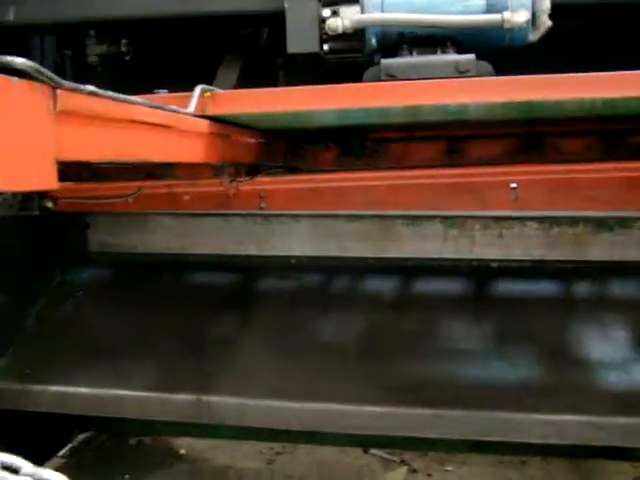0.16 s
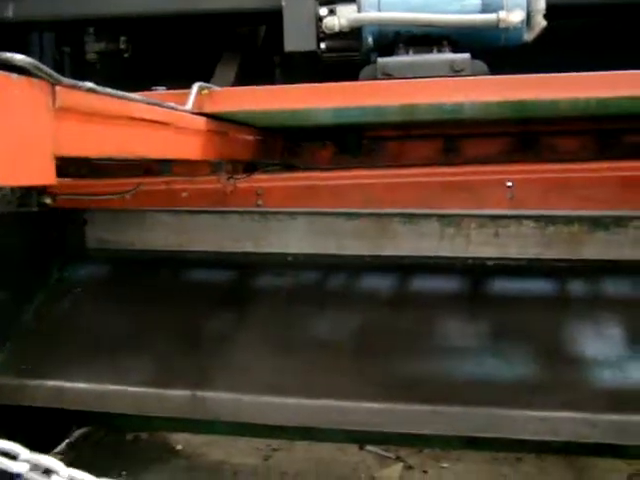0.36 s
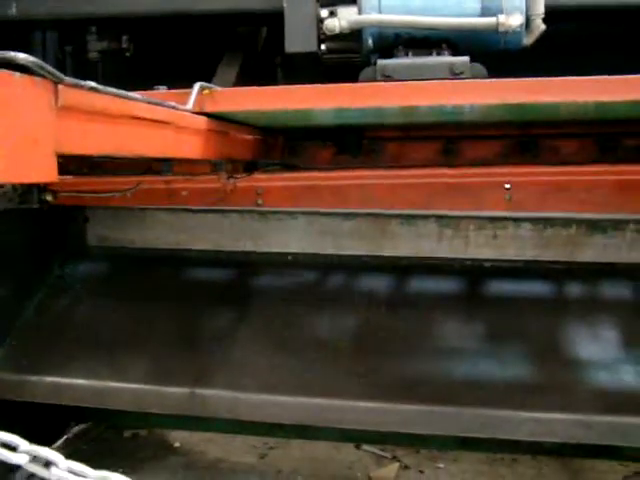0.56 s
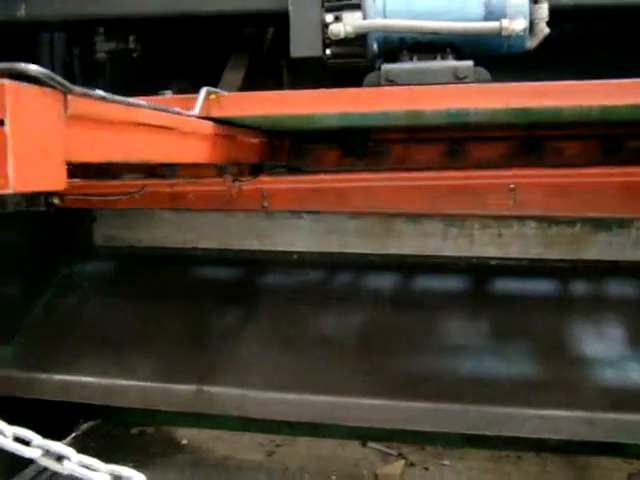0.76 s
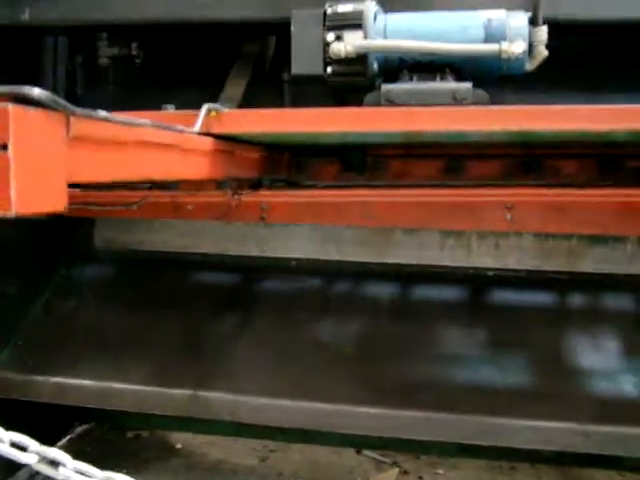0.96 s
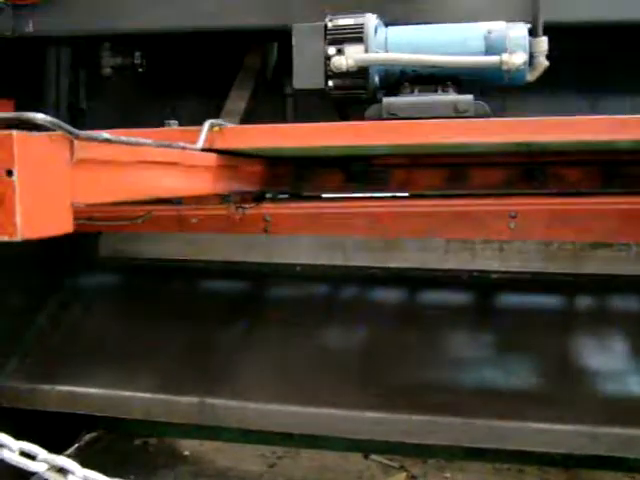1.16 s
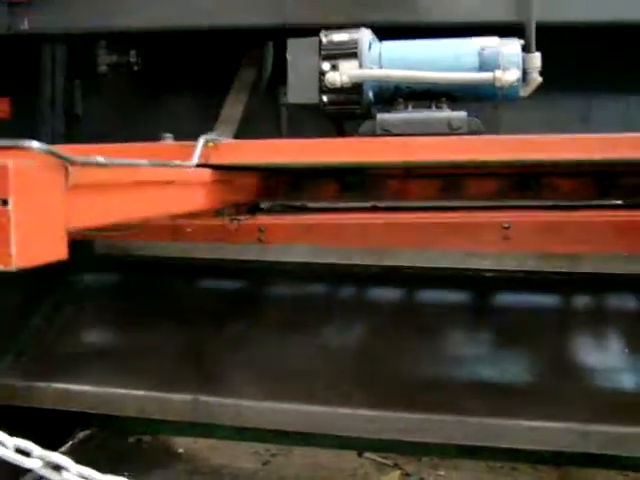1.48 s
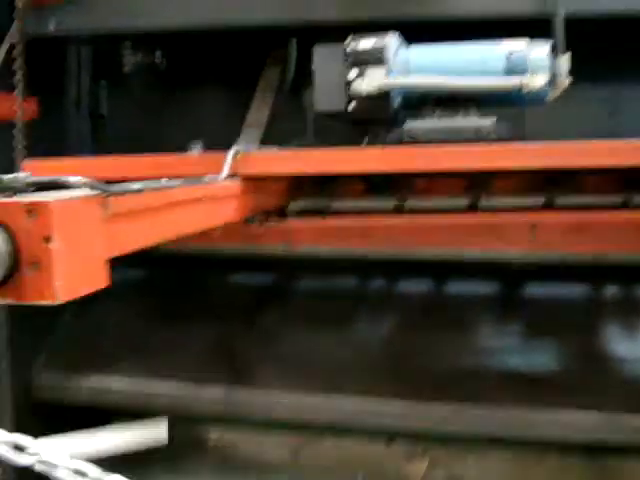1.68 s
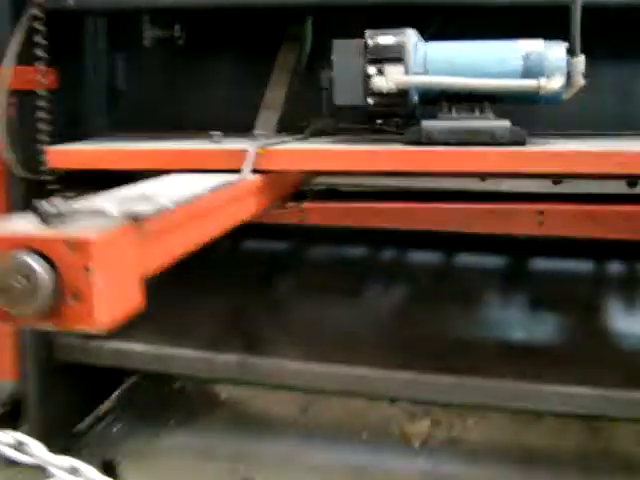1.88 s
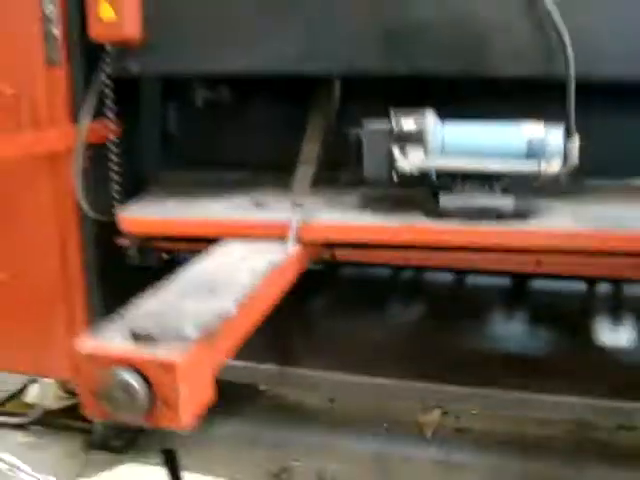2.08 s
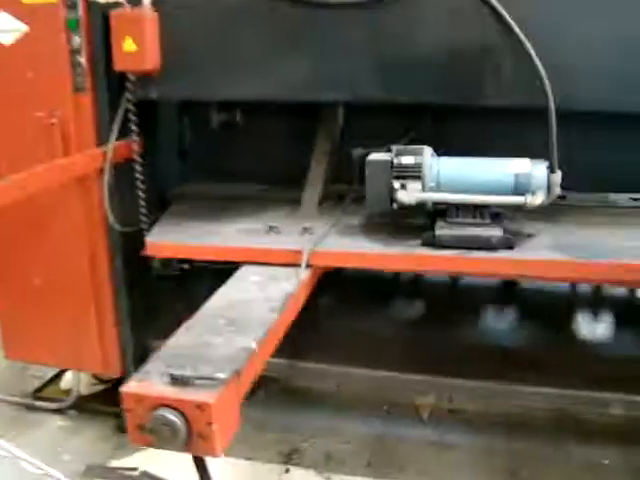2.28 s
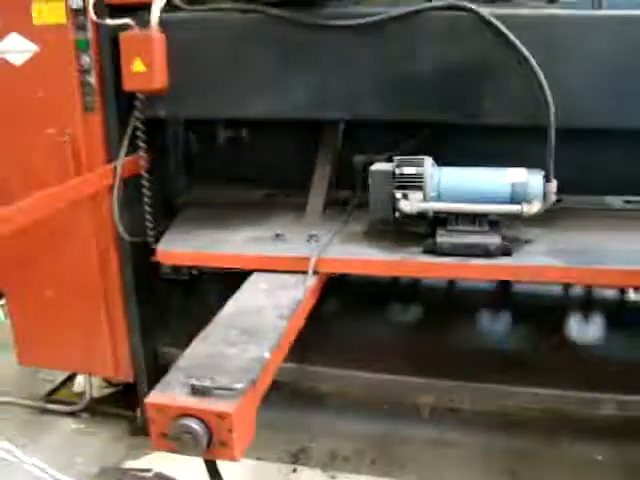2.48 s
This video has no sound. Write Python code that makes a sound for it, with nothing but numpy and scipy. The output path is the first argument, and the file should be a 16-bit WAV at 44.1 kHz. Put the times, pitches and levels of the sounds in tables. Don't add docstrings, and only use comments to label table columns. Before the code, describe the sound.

A hydraulic metal shear roars and whines close by in a workshop; the blade scrapes, the frame knocks hard, the cut strip crashes and rings, then a valve hisses. Small mono microphone with dull, patchy treble.

```python
import sys
import numpy as np
from scipy import signal
from scipy.fft import rfft, irfft
from scipy.io import wavfile
from scipy.ndimage import uniform_filter1d

SR = 44100
rng = np.random.default_rng(int(sys.argv[2]) if len(sys.argv) > 2 else 0)


def dump(signal):
    limited = np.clip(np.atleast_2d(signal).T, -1, 1)
    pcm = np.round(limited * 32767).astype(np.int16)
    wavfile.write(sys.argv[1], SR, pcm)


def ratio(d):
    e = np.asarray(d, float) / 20
    return 10 ** e


N = 115983

# time in seconds, level in dB.
VALVE_LEVEL = [
    (0, -29),
    (.5, -28.5),
    (.8, -33),
    (1.2, -35.5),
    (2.1, -71),
    (2.4, -34.5),
    (2.48, -22),
    (2.63, -20),
]
# frequency in Hz, density in dB per Hz.
VALVE_COLOUR = [(2500, 0.5), (6000, 1), (10300, 1)]

# time in seconds, roar level in dB, weight of the low rumble in dB.
PUMP_EFFORT = [(0, -22, -7), (0.451, -21, -5.5), (0.671, -22.5, -10), (.9, -24, -12), (1.241, -23.5, -5.5),
               (1.25, -28.5, -14), (1.42, -30.5, -14.5), (1.52, -32.5, -17.5), (1.7, -30, -10.5),
               (1.83, -27, -11.5), (1.86, -29, -22), (2.05, -31, -15), (2.24, -27, -12.5),
               (2.3, -25.5, -8.5), (2.63, -29.5, -8)]
# frequency in Hz, density in dB per Hz.
ROAR_COLOUR = [(25, -33), (90, -24), (154, -19), (374, -1.5), (797, -2.5), (1500, 0), (2500, -3),
               (4000, -9), (10400, -23)]
# frequency in Hz, level in dB re the roar.
PISTON_WHINE = [(372, -31), (619, -26), (1885, -14.5), (117, -40.5), (58.3, -56)]
RUMBLE_HZ, PATCH_DB, FLICKER_DB = 707, 1.5, 0.07

# start in seconds,
# level in dB, length in seconds, centre in Hz.
SCRAPES_AND_THUMPS = [(.004, -29.5, 0.1, 2930), (0.544, -22.5, .05, 2730), (0.547, -28, .04, 3630),
                      (0.542, -26.5, 0.056, 5000), (0.701, -19.5, 0.014, 2700), (0.7, -21.5, 0.013, 654),
                      (1.059, -28, 0.013, 430), (1.078, -21, .008, 2570), (1.113, -21.5, 0.0073, 452),
                      (1.082, -22.5, .005, 490), (1.838, -22.5, 0.0062, 3230), (1.842, -29, 0.019, 2200)]
SCRAPE_WIDTH, SCRAPE_T60 = 0.11, 0.14
# time in seconds, level in dB.
BEAM_GROAN = [
    (1.25, -55),
    (1.3, -43.5),
    (1.7, -40),
    (1.82, -34),
    (1.85, -45.5),
    (2.15, -42),
    (2.3, -63),
]
GROAN_HZ = 969

# start in seconds, level in dB, length in seconds, pitch factor.
FRAME_KNOCKS = [
    (0.702, -15.5, 0.0051, 1.1),
    (0.723, -27, .05, 1.03),
    (0.855, -22, 0.078, 0.89),
    (0.928, -16.5, 0.03, 1.07),
    (0.975, -24.5, 0.11, 0.99),
    (1.045, -27.5, 0.048, 0.91),
    (1.268, -26, 0.014, 1.01),
    (2.269, -22.5, 0.013, 0.78),
    (2.305, -27, .02, 0.94),
]
# frequency in Hz, level in dB, t60 in seconds.
FRAME_MODES = [(468, -8, 0.28), (619, -24, 0.12), (1000, -7, 0.11), (1231, -12, 0.057), (1437, -19.5, 0.21),
               (1637, -11.5, 0.15), (1804, -12, 0.12), (2060, -17, 0.12), (2164, -10, 0.1),
               (2420, -11.5, 0.071), (2700, -11.5, 0.03)]
# frequency in Hz, density in dB per Hz.
THUD_COLOUR = [(250, -28), (550, -28), (1200, 13.5), (2600, 10), (4000, 5), (10000, -19)]
THUD_DB, THUD_T60 = -6, 0.18
# start in seconds, frequency in Hz, level in dB,
# length in seconds.
FRAME_HUMS = [(.702, 2700, -24, 0.014), (.74, 1262, -25, 0.046), (.75, 1020, -29, 0.085),
              (.85, 1240, -27.5, .055), (.93, 1000, -25, 0.082), (.932, 2450, -29, 0.023),
              (.935, 2150, -24, 0.026), (.955, 1232, -31, 0.018), (.975, 2140, -27, 0.02),
              (.97, 1460, -25, .03), (.995, 1250, -28, 0.028), (1.03, 979, -25, 0.024),
              (1.062, 2413, -28, 0.018), (1.066, 510, -29.5, 0.02)]

# start in seconds, crash in dB, low ring in dB, high ring in dB, length in seconds.
STRIP_CLANKS = [(0.543, -22.5, -45, -37.5, 0.034), (1.068, -27, -52, -29.5, 0.043),
                (1.244, -34.5, -28, -23, 0.012), (1.259, -34, -29.5, -43, 0.038),
                (1.299, -34.5, -35.5, -31, 0.041), (1.438, -27, -31, -33.5, 0.032),
                (1.489, -37, -28, -27, 0.0086), (1.499, -38, -26, -43, 0.022),
                (1.544, -33.5, -33.5, -31.5, 0.041), (1.598, -45, -31.5, -39, 0.015),
                (1.622, -45, -29.5, -34, 0.0093), (1.835, -26.5, -37, -34, 0.027),
                (1.867, -28.5, -39, -29.5, 0.027), (1.913, -32.5, -47, -45, 0.041),
                (1.969, -32.5, -31, -36.5, 0.048), (2.266, -29, -37, -36, 0.011)]
# frequency in Hz, level in dB, t60 in seconds.
STRIP_LOW_MODES = [(2760, -34, 0.051), (3000, -8, 0.37), (3140, -7.5, 0.17), (3212, -5, 0.26),
                   (3455, -32, 0.18)]
# frequency in Hz, level in dB, t60 in seconds.
STRIP_HIGH_MODES = [(3820, -1.5, 0.22), (4100, -10.5, 0.25), (4572, -4.5, 0.29), (4900, -3, 0.14),
                    (5100, -2, 0.075), (5600, -3.5, 0.08), (6900, 0, .05), (8500, -5.5, 0.033),
                    (9300, -1, 0.061), (10070, 0, 0.055)]
# frequency in Hz, density in dB per Hz.
CRASH_COLOUR = [(1200, -22), (2500, 1), (3500, 2), (5500, 4.5), (7500, -0.5), (10500, -12.5)]
# frequency in Hz, density in dB per Hz.
SIZZLE_COLOUR = [(3500, -29), (5500, -3), (7000, -8), (8500, 6), (10500, 2)]
CRASH_T60, SIZZLE_DB, SIZZLE_T60 = 0.24, 1, 0.26
STRIP_DETUNE = .0015
# start in seconds, frequency in Hz, level in dB,
# length in seconds.
STRIP_SONG = [(1.068, 6160, -33, 0.016), (1.084, 5850, -25, 0.01), (1.083, 7800, -27.5, 0.0046),
              (1.244, 8500, -29.5, .01), (1.256, 3140, -29.5, 0.02), (1.259, 6900, -35, .013),
              (1.261, 9330, -37, 0.018), (1.262, 4572, -31, 0.024), (1.264, 5600, -38, 0.025),
              (1.287, 9300, -39, .025), (1.292, 8400, -37, .02), (1.299, 3230, -23.5, 0.05),
              (1.303, 3480, -30, 0.026), (1.305, 3040, -31, .03), (1.328, 5140, -37, 0.042),
              (1.338, 3216, -30.5, .035), (1.34, 4550, -40, .025), (1.385, 3170, -33, 0.048),
              (1.439, 5110, -27.5, 0.032), (1.439, 3080, -27, 0.013), (1.44, 3455, -32, .035),
              (1.446, 3880, -37, 0.045), (1.467, 3030, -30, 0.017), (1.469, 3150, -17, 0.0068),
              (1.492, 3772, -31, 0.018), (1.505, 3190, -22, 0.022), (1.512, 5059, -29.5, 0.027),
              (1.54, 3440, -32, 0.029), (1.54, 2980, -34, 0.055), (1.565, 3190, -37, 0.016),
              (1.589, 3134, -27, 0.012), (1.62, 3470, -31, 0.025), (1.862, 3190, -35, .02),
              (1.85, 3015, -28, 0.023), (1.878, 3205, -31, 0.061), (1.878, 3010, -32, 0.073),
              (1.85, 4690, -37, 0.1), (1.965, 3007, -35, 0.062), (1.968, 3212, -37, 0.077)]

RATTLE_PER_S, SPREAD_DB, RATTLE_SHARE = 1000, 7, 0.57
STRIKE = 1
SING_T60, SING_RISE_S, WAVER_DB, WAVER_RAD = .07, .0025, 2.8, .55

# start in seconds,
# length in seconds, depth in dB.
LEVEL_DIPS = [
    (0.547, 0.03, -2.5),
    (1.085, 0.019, -9),
    (1.244, 0.022, -8),
    (1.285, 0.074, -7),
    (1.421, 0.013, -2),
    (1.488, 0.076, -3.5),
    (1.824, 0.0077, -1),
    (1.868, 0.091, -2.5),
]
# start in seconds, length in seconds, from Hz, to Hz.
TREBLE_GAPS = [(.524, .016, 4700, 5300), (.528, .008, 5300, 6900), (1.335, .03, 9700, 12000),
               (1.328, .007, 7100, 7900), (1.341, .006, 6200, 7900), (1.253, .005, 4800, 9500),
               (1.42, .018, 4800, 12000), (1.522, .011, 6200, 7500), (1.662, .015, 6100, 7500),
               (1.818, .018, 4800, 12000), (1.826, .007, 2800, 4800), (2.25, .009, 5300, 12000)]
# from seconds, to seconds.
BUSY_STRETCHES = [(.62, .65), (.71, .79), (1.05, 1.13), (1.25, 1.27), (1.32, 1.37)]
HOLE_SHARE, BUSY_HOLES, HOLES_ABOVE_HZ, HOLE_DB = .065, 3.5, 4800, -26
MIC_LOW_HZ, MIC_HIGH_HZ = 224, 10010
CHOKE_S, CHOKE_DB = 1.09, -5


def evened(x):
    return x / np.sqrt(np.mean(x ** 2) + 1e-20)


def read(points, hz):
    f, value = np.transpose(points)
    return np.interp(np.log(hz + 1), np.log(f + 1), value)


def filtered(x, points):
    hz = np.fft.rfftfreq(len(x), 1 / SR)
    return irfft(rfft(x) * ratio(read(points, hz)), len(x))


def coloured(x, points):
    return evened(filtered(x, points))


def burst(s, length, t60):
    t = np.arange(N) / SR - s
    return np.clip(t * 1000, 0, 1) * ratio(-60 * np.clip(t - length, 0, None) / t60)


def ring(x, hz, t60):
    r = 10 ** (-3 / (t60 * SR))
    turn = 2 * np.pi * hz / SR
    return np.sqrt(8 * (1 - r)) * signal.lfilter([np.sin(turn)], [1, -2 * r * np.cos(turn), r * r], x)


def rattle():
    sizes = ratio(SPREAD_DB * np.minimum(rng.exponential(1, N), 2))
    ticks = (rng.random(N) < RATTLE_PER_S / SR) * rng.choice([-1, 1], N) * sizes
    clumps = ratio(0.8 * evened(uniform_filter1d(rng.standard_normal(N), size=300)))
    return evened(clumps * (RATTLE_SHARE * evened(ticks) + rng.standard_normal(N)))


def struck(events, modes, contact_t60, detune):
    out, shake = np.zeros(N), rattle()
    chance = rng.standard_normal((40, len(modes), 3))
    for (s, db, length, pitch), row in zip(events, chance):
        a = round(s * SR)
        drive = (shake * burst(s, length, contact_t60))[a:a + SR // 3]
        t = np.arange(len(drive)) / SR
        for (hz, mode_db, t60), (weight, shift, phase) in zip(modes, row):
            f = hz * pitch * (1 + detune * shift)
            decay = np.minimum(t / .003, 1) * ratio(-60 * t / t60)
            blow = STRIKE * decay * np.sin(2 * np.pi * (f * t + phase))
            level = ratio(db + mode_db + 2.0 * np.clip(weight, -1.5, 1.5))
            out[a:a + SR // 3] += level * (ring(drive, f, t60) + blow)
    return out


def singing(notes):
    out = np.zeros(N)
    waver = evened(uniform_filter1d(rng.standard_normal((60, SR // 5)), size=250))
    t = np.arange(SR // 5) / SR
    for (s, hz, db, length), w in zip(notes, waver):
        part = out[round(s * SR):][:len(t)]
        shape_db = db + WAVER_DB * w - 60 * np.clip(t - length, 0, None) / SING_T60
        swell = np.sqrt(2) * np.minimum(t / SING_RISE_S, 1) * ratio(shape_db)
        tone = swell * np.sin(2 * np.pi * hz * t + WAVER_RAD * w[::-1])
        part += tone[:len(part)]
    return out


def valve():
    level = ratio(np.interp(np.arange(N) / SR, *np.transpose(VALVE_LEVEL)))
    return level * coloured(rng.standard_normal(N), [(900, -41), *VALVE_COLOUR])


def pump():
    frames, hz = N // 128 + 6, np.fft.rfftfreq(512, 1 / SR)
    a, b, patches = rng.standard_normal((frames, 257, 3)).T
    patches = evened(uniform_filter1d(uniform_filter1d(patches, size=4, axis=0), size=16, axis=1))
    flicker = evened(uniform_filter1d(rng.standard_normal(frames), size=5))
    s, level_db, low_db = np.transpose(PUMP_EFFORT)
    load_db = np.interp(np.arange(frames) * 128 / SR, s, low_db + 5.5)
    rumble_db = load_db / (1 + (hz[:, None] / RUMBLE_HZ) ** 4)
    z = (a + 1j * b) * ratio(PATCH_DB * patches + FLICKER_DB * flicker)
    even = signal.istft(z, nperseg=512, noverlap=384)[1]
    loaded = signal.istft(z * ratio(rumble_db), nperseg=512, noverlap=384)[1][:N]
    roar = filtered(loaded / np.std(even), ROAR_COLOUR)

    t = np.arange(N) / SR
    drift = rng.standard_normal((len(PISTON_WHINE), N))
    drift = evened(uniform_filter1d(uniform_filter1d(drift, size=3000), size=3000))
    whine = np.zeros(N)
    for (f, db), d in zip(PISTON_WHINE, drift):
        follow_db = (f < RUMBLE_HZ) * np.interp(t, s, low_db + 7.5)
        phase = 2 * np.pi * np.cumsum(f * (1 + 0.0019 * d)) / SR
        whine += ratio(db + 0.65 * d + follow_db) * np.sin(phase)
    return ratio(np.interp(t, s, level_db) + 2.0) * (roar / np.std(roar[:SR // 2]) + whine)


def blade():
    noise, out = rattle(), np.zeros(N)
    for s, db, length, hz in SCRAPES_AND_THUMPS:
        below, above = hz * (1 - SCRAPE_WIDTH), hz * (1 + SCRAPE_WIDTH)
        resonance = [(hz / 2, -50), (below, -6), (hz, 0), (above, -6), (hz * 2, -50)]
        out += ratio(db) * burst(s, length, SCRAPE_T60) * coloured(noise, resonance)
    groan = evened(ring(rng.standard_normal(N), GROAN_HZ, 0.12))
    return out + ratio(np.interp(np.arange(N) / SR, *np.transpose(BEAM_GROAN))) * groan


def frame():
    thud = sum(ratio(db + THUD_DB) * burst(s, length, THUD_T60) for s, db, length, _ in FRAME_KNOCKS)
    knocks = ratio(-5.0) * struck(FRAME_KNOCKS, FRAME_MODES, 0.01, 0.0061)
    return knocks + thud * coloured(rattle(), THUD_COLOUR)


def strip():
    crash, sizzle = np.zeros(N), np.zeros(N)
    low_hits, high_hits = [], []
    for s, crash_db, low_db, high_db, length in STRIP_CLANKS:
        crash += ratio(crash_db) * burst(s, length, CRASH_T60)
        sizzle += ratio(high_db + SIZZLE_DB) * burst(s, length, SIZZLE_T60)
        low_hits.append((s, low_db, length, 1))
        high_hits.append((s, high_db - 12, length, 1))
    low = struck(low_hits, STRIP_LOW_MODES, 0.017, STRIP_DETUNE)
    high = struck(high_hits, STRIP_HIGH_MODES, 0.016, STRIP_DETUNE)
    noise = crash * coloured(rattle(), CRASH_COLOUR) + sizzle * coloured(rattle(), SIZZLE_COLOUR)
    return noise + low + high


def scene():
    t = np.arange(N) / SR
    duck_db = np.zeros(N)
    for s, length, db in LEVEL_DIPS:
        duck_db += db * np.clip((t - s) / 0.0049, 0, 1) * np.clip(1 - (t - s - length) / 0.0052, 0, 1)
    since = t - CHOKE_S
    choke_db = CHOKE_DB * np.clip(since / .004, 0, 1) * np.clip(1 - since / 0.081, 0, 1)
    low_cut = signal.butter(3, MIC_LOW_HZ, "high", fs=SR, output="sos")
    body = signal.sosfilt(low_cut, frame() + singing(FRAME_HUMS))
    metal = signal.sosfilt(low_cut, strip() + singing(STRIP_SONG) + blade())
    mix = valve() + ratio(duck_db) * (pump() + body) + ratio(choke_db) * metal
    return np.array([mix, mix])


def top_cut(x):
    return signal.sosfilt(signal.butter(12, 11070, fs=SR, output="sos"), x)


def record(dry):
    hz, t, z = signal.stft(dry, SR, nperseg=256, noverlap=224)
    high = hz[:, None]
    gap = np.zeros((len(hz), len(t)))
    for s, length, lo_hz, hi_hz in TREBLE_GAPS:
        gap += (abs(t - s - length / 2) < length / 2) * (high > lo_hz) * (high < hi_hz)
    busy = sum((t > a) * (t < b) for a, b in BUSY_STRETCHES)
    share = HOLE_SHARE * (1 + BUSY_HOLES * busy)
    cells = np.kron(rng.random((len(hz) // 3 + 1, len(t) // 7 + 1)), np.ones((3, 7)))
    holes = cells[:len(hz), :len(t)] < share
    cut_db = -45 * np.minimum(gap, 1) + HOLE_DB * holes * (high > HOLES_ABOVE_HZ)
    x = signal.istft(z * ratio(cut_db), SR, nperseg=256, noverlap=224)[1][:, :N]
    band_limit = signal.firwin(511, MIC_HIGH_HZ, window=("kaiser", 9), fs=SR)
    x = signal.oaconvolve(x, band_limit[None], "same")
    return top_cut(x)


dry = scene()
out = record(dry)
dump(out)
```